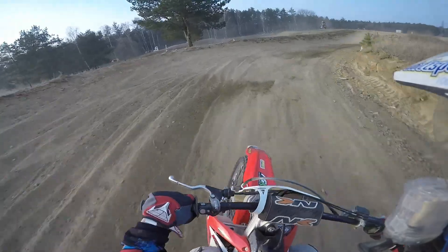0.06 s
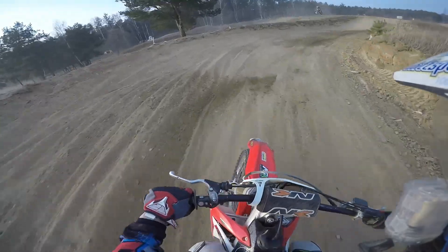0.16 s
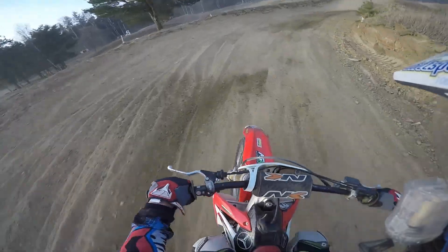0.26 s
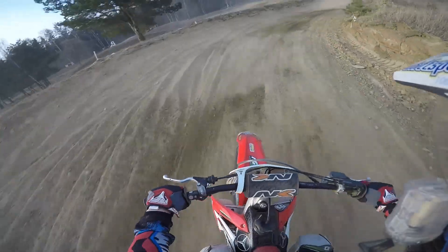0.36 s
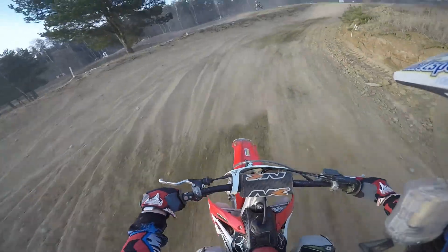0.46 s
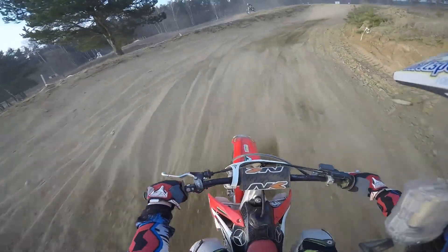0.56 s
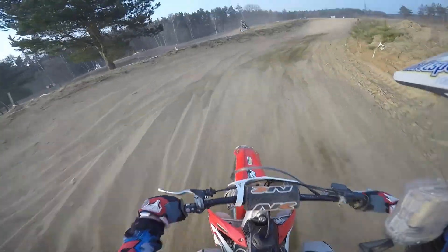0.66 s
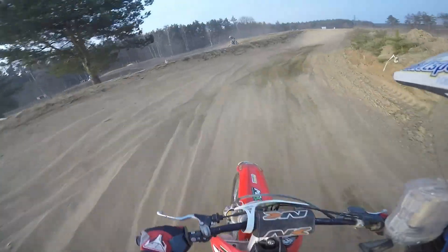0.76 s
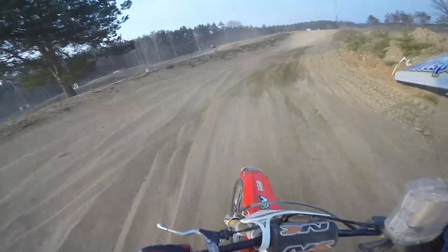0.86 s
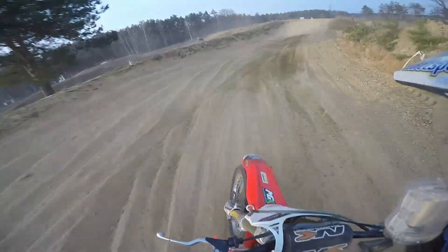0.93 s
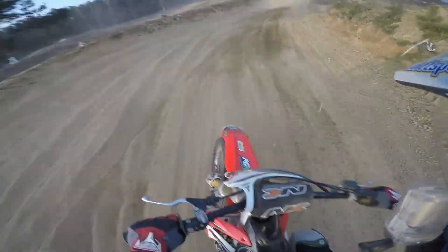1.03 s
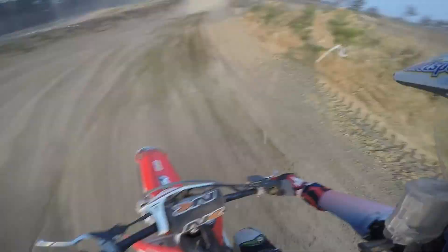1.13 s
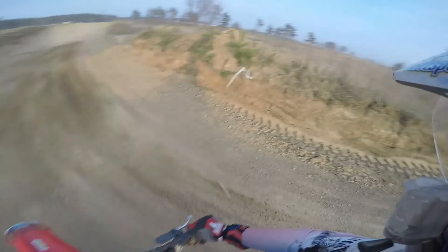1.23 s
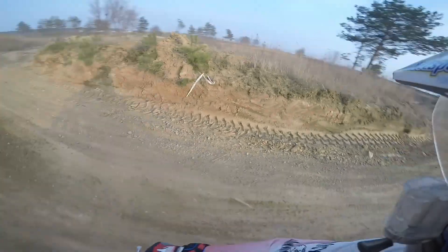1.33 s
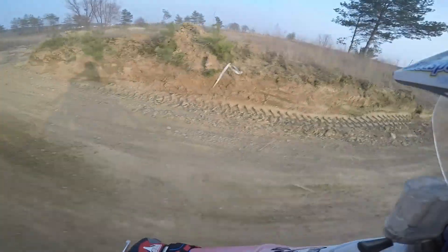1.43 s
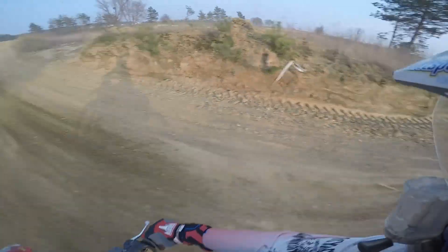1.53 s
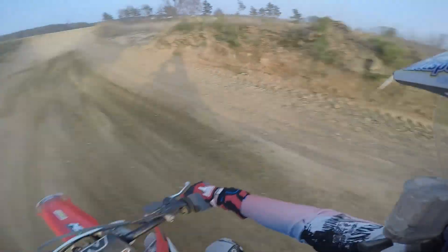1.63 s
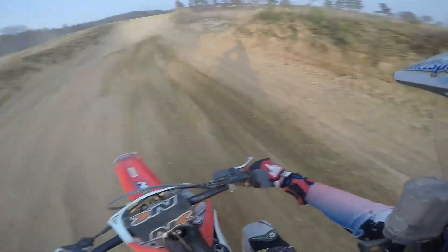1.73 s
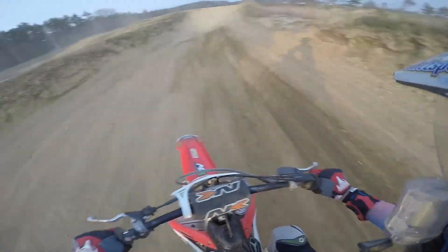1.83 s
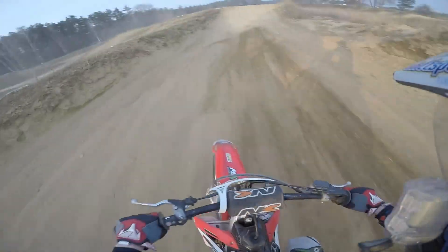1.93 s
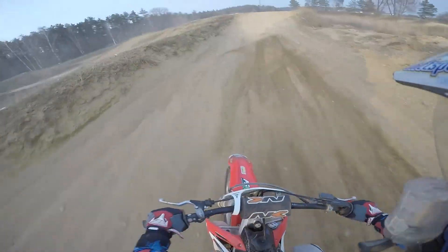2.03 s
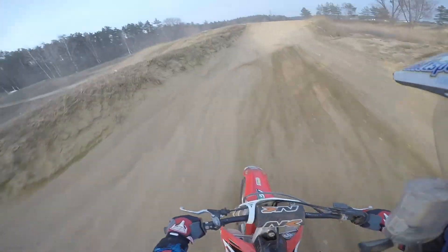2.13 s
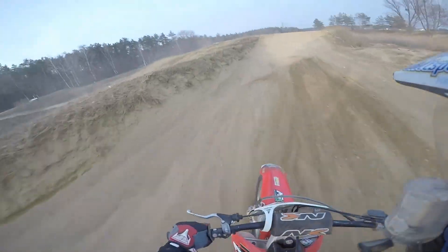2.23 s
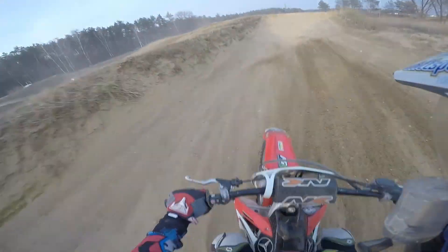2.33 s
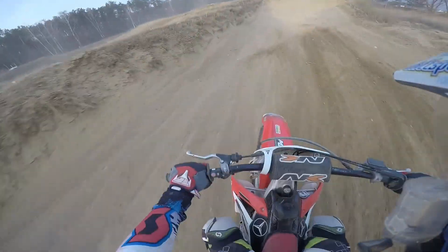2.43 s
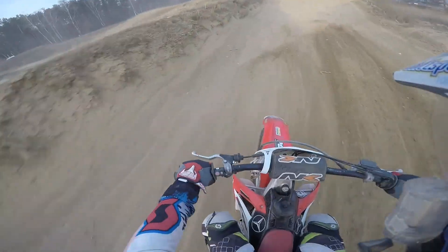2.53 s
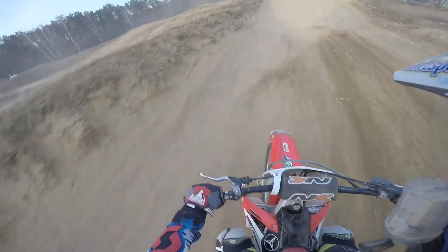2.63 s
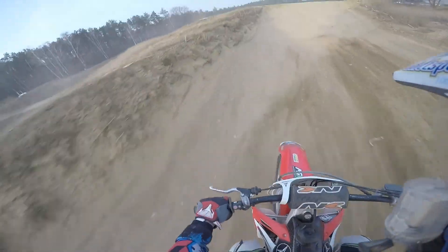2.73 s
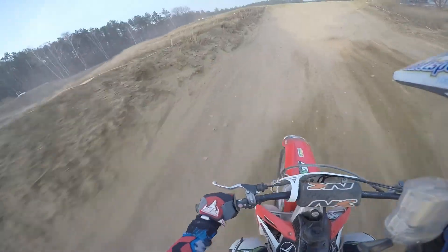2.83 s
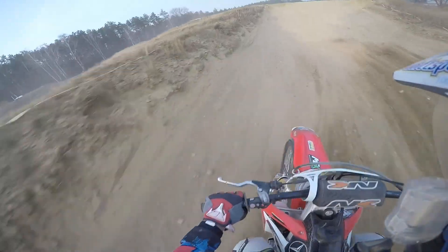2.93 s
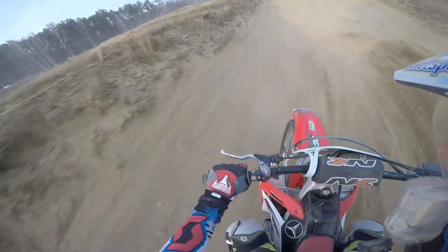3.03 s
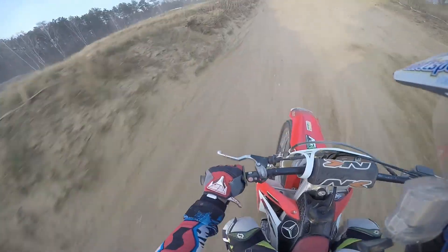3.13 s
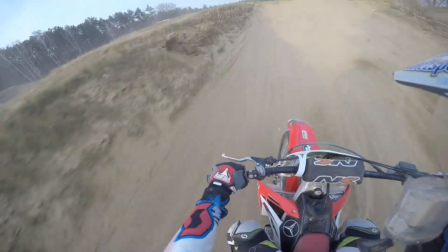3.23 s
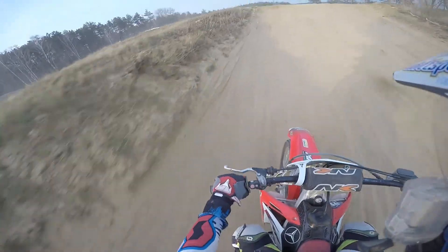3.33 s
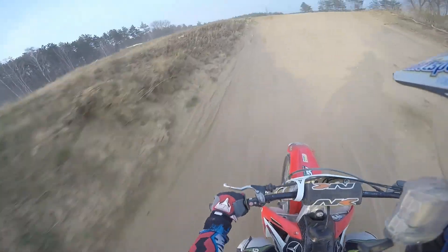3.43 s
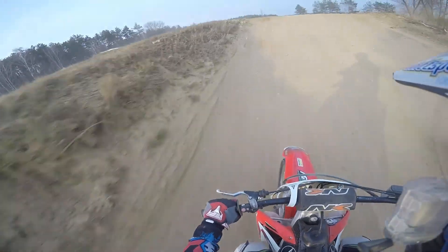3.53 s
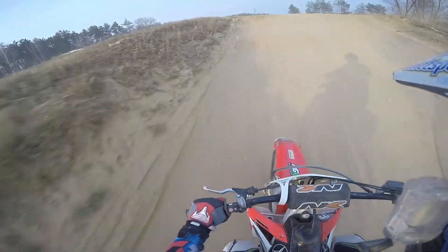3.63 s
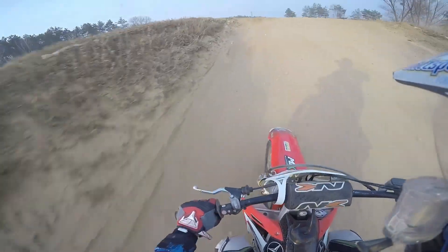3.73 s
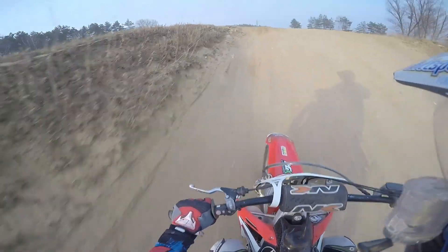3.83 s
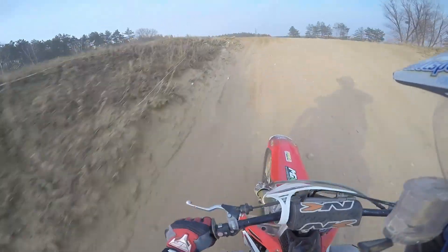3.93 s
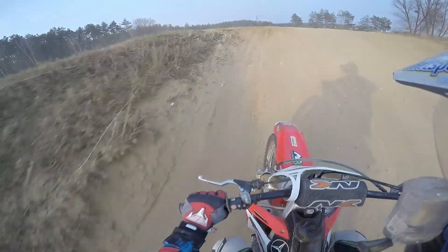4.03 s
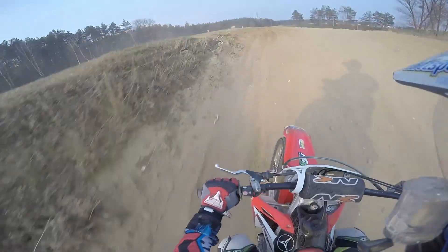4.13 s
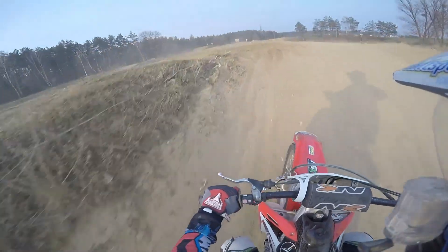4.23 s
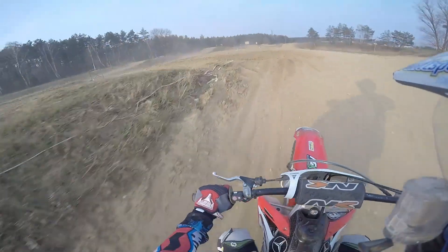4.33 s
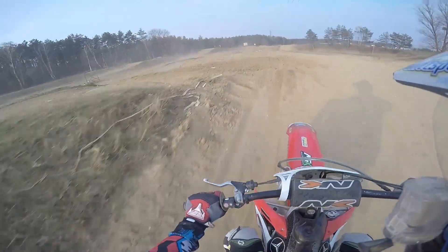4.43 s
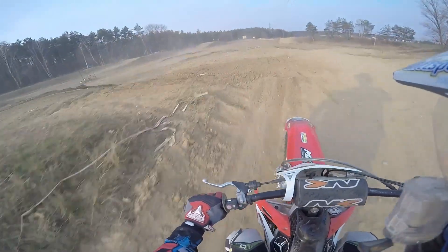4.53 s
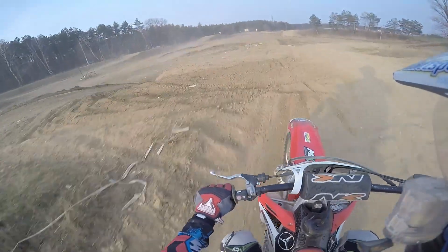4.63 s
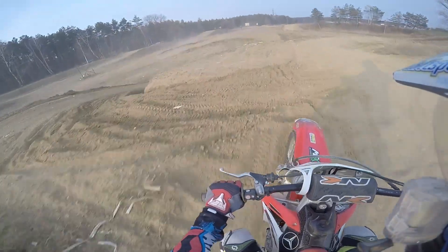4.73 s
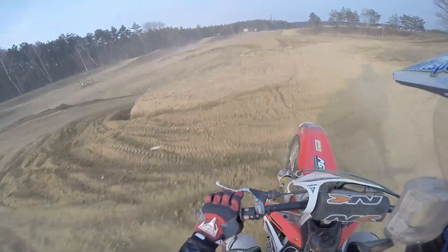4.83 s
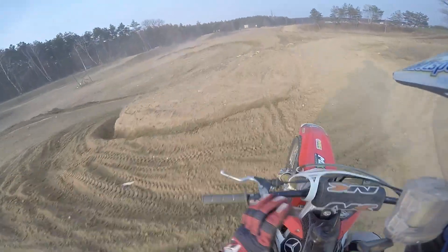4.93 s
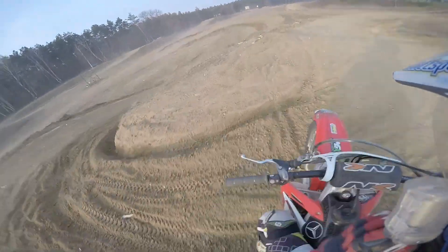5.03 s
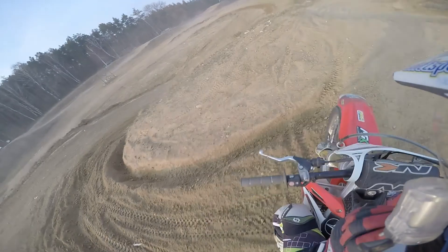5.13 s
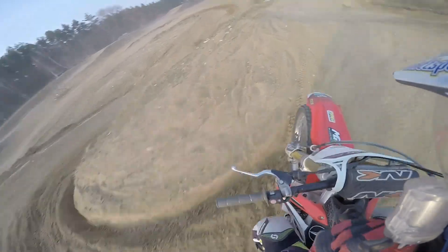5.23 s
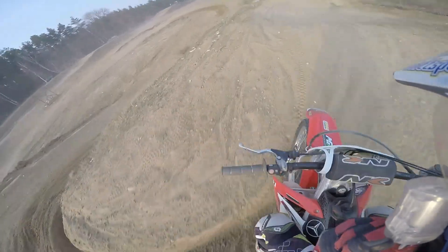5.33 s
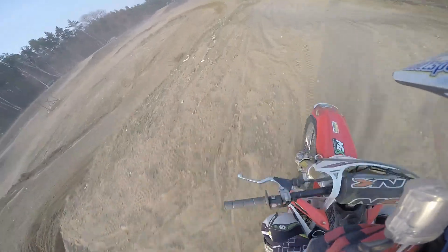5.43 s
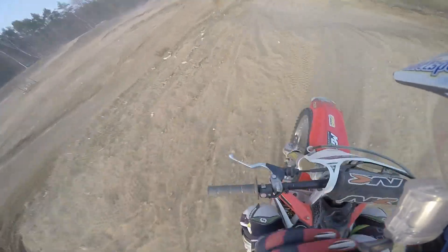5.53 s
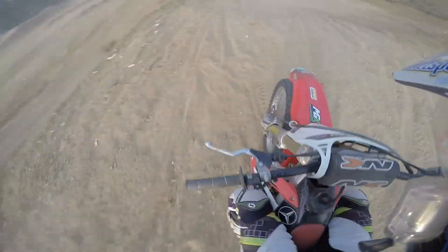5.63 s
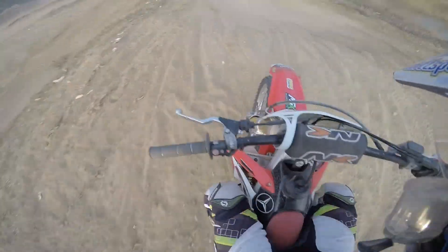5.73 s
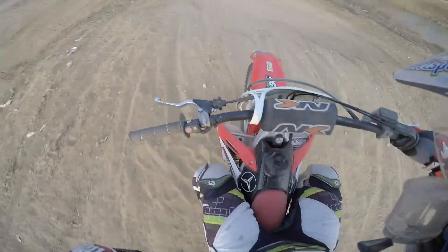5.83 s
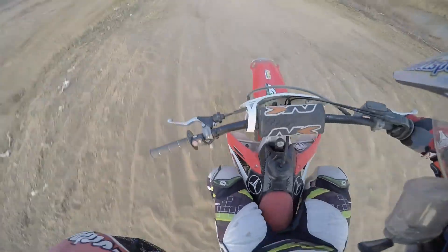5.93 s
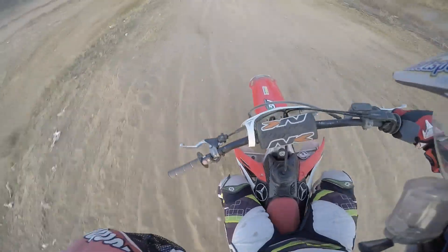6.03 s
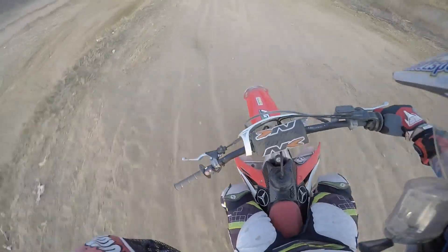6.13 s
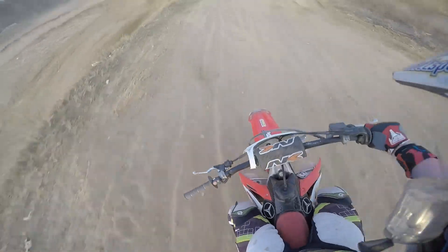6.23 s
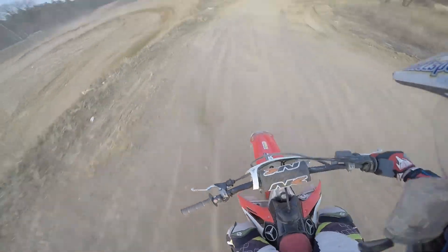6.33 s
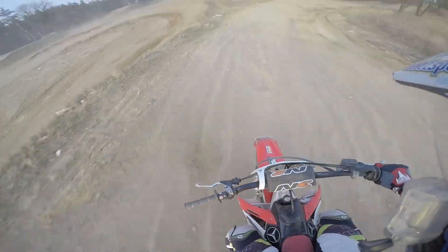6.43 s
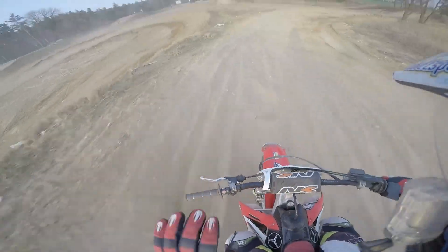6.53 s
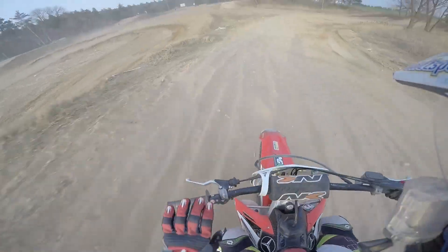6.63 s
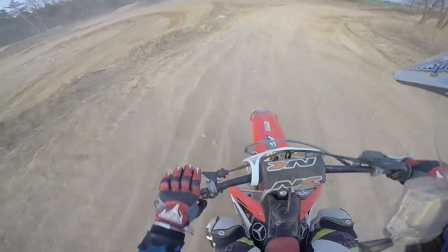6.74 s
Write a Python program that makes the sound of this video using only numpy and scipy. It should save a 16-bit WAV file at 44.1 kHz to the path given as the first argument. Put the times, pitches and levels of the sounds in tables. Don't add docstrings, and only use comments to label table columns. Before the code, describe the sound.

A single-cylinder dirt bike blips its throttle again and again over dry chain rattle, until a hard triple knock hits and the engine drops quieter.

```python
import sys
import numpy as np
from scipy import signal
from scipy.fft import rfft, irfft, next_fast_len
from scipy.io import wavfile
from scipy.ndimage import uniform_filter1d, map_coordinates

SR = 44100
rng = np.random.default_rng(int(sys.argv[2]) if len(sys.argv) > 2 else 0)


def pcm_store(signal):
    levels = np.round(np.clip(np.atleast_2d(signal), -1, 1) * 32767)
    wavfile.write(sys.argv[1], SR, levels.astype(np.int16).T)


def elevation(decibels):
    levels = np.asarray(decibels, float)
    return 10 ** (levels / 20)


N = 298557


def unit(x):
    return x / np.sqrt(np.mean(x ** 2) + 1e-20)


def curves(rows, at=None):
    times, *columns = np.transpose(rows)
    at = np.arange(N) / SR if at is None else at
    return [np.interp(at, times, column) for column in columns]


def wobble(rate):
    knots = rng.standard_normal(int(N * rate / SR) + 4)
    return map_coordinates(knots, [np.arange(N) * rate / SR])


def filtered(x, response):
    size = next_fast_len(N + SR // 2)
    spectrum = rfft(x, size) * response(np.fft.rfftfreq(size, 1 / SR))
    return irfft(spectrum, size)[:N]


def impulse_norm(response):
    return np.linalg.norm(filtered(np.arange(N) == 0, response))


def modes(table):
    def response(f):
        total = 0
        for k, (hz, width, db) in enumerate(table):
            damping = 1j * f * width
            total = total + (-1) ** k * elevation(db) * damping / (hz * hz - f * f + damping)
        return total
    return response


def slopes(points):
    hz, db = np.transpose(points)
    return lambda f: elevation(np.interp(np.log(f + 1), np.log(hz), db, left=-120))


def patchy(depth_db):
    z = signal.stft(rng.standard_normal(N + 512), nperseg=512)[2]
    field = uniform_filter1d(rng.standard_normal(z.shape), size=2, axis=0)
    field = uniform_filter1d(field, size=4, axis=1)
    return signal.istft(z * elevation(depth_db * unit(field)), nperseg=512)[1][:N]


def add_ring(out, s, db, hz, t60, rise):
    part = out[round(s * SR):][:round(1.5 * t60 * SR)]
    t = np.arange(len(part)) / SR
    envelope = elevation(db - 60 * t / t60) * (1 - np.exp(-t / rise))
    part += envelope * np.sin(2 * np.pi * hz * t)


def swells(t, s, hold, db, fall, rise):
    u = t - s[:, None]
    growth = rise * np.minimum(u, 0)
    decay = fall[:, None] * np.maximum(u - hold[:, None], 0)
    return elevation(2 * (db[:, None] + growth - decay))


DUCK_S = [
    5.667,
    5.725,
    5.85,
    6.034,
    6.037,
    6.3,
    6.55,
]
DUCK_DB = [-0.5, -13.5, -14.5, -13.5, -11, -8, -5.5]


def duck():
    return np.interp(np.arange(N) / SR, DUCK_S, DUCK_DB)


# (first loaded firing [s], hold [s], rattle [dB], fading [dB/s], pipe thump over rattle [dB])
BLIPS = [(.01, 0.059, -37, 80, -11), (0.1, 0.068, -20.5, 138, 1), (.47, 0.04, -22.5, 138, -3),
         (.845, 0.07, -21, 121, -1), (1.294, 0.042, -23.5, 61, 0), (1.525, 0.036, -23.5, 136, 2),
         (1.893, 0.055, -22.5, 80, 0), (2.166, 0.054, -31, 46, -2.5), (2.612, 0.087, -23.5, 126, 0.5),
         (2.889, 0.055, -21, 80, 0.5), (3.078, 0.069, -30, 30, -1.5), (3.541, 0.057, -19.5, 169, -1),
         (3.855, 0.062, -25, 90, -2.5), (4.09, 0.079, -21.5, 78, -2), (4.562, 0.01996, -38, 56, 3),
         (4.6, 0.025, -24.5, 74, 0), (5.097, 0.011, -21, 165, -3), (5.341, 0.038, -32, 54, -21),
         (5.43, 0.034, -26, 90, -2.5), (5.553, 0.075, -26, 99, -2.5), (6.042, 0.086, -29, 138, -1.5),
         (6.282, 0.028, -26, 113, -0.5), (6.474, 0.064, -30, 60, -1), (6.543, 0.025, -21.5, 103, -5)]
FIRINGS = [3, 14, 11, 14, 8, 12, 10, 14, 10, 7, 15, 11, 8, 15, 1, 13, 6, 2, 3, 12, 7, 6, 2, 7]
LAST_S = 6.78


def crank():
    climb_per_s, sag_s, sag_to = 1.3, 0.2, 0.62
    lead, lead_s = 0.5, 0.03
    s, hold = np.transpose(BLIPS)[:2]
    t = np.arange(N + SR // 10) / SR
    blip = np.maximum(np.searchsorted(s, t) - 1, 0)
    since_shut = t - (s + hold)[blip]
    next_blip = np.r_[s[1:], LAST_S][blip]
    pickup = 1 + lead * np.exp(-np.abs(next_blip - t) / lead_s)
    climb = np.exp(climb_per_s * np.minimum(since_shut, 0))
    sag = sag_to + (1 - sag_to) * np.exp(-np.maximum(since_shut, 0) / sag_s)
    free = np.cumsum(pickup * np.where(since_shut < 0, climb, sag))
    marks = np.interp(np.r_[0, s, LAST_S], t, free)
    return np.interp(free[:N], marks, np.cumsum(np.r_[.7, .3, FIRINGS]))


# (time [s], level [dB])
COAST = [(0, -31), (.3, -28.5), (.58, -31), (.74, -24.5), (.97, -25.5), (1.06, -31.5), (1.26, -30.5),
         (1.45, -27), (1.83, -30.5), (2.3, -30.5), (2.54, -31.5), (3.05, -27.5), (3.47, -33), (3.75, -30),
         (4.45, -32.5), (5.3, -35), (5.9, -39), (6.77, -29)]


def throttle(t):
    opening_s, opening_db_per_s = 0.012, 264
    overrun_db, overrun_db_per_s = -13, 33
    thump_shut_db = -14
    thump_fades = 2.37
    s, hold, db, fall, pipe_db = np.transpose(BLIPS)
    s = s + opening_s
    hold = np.maximum(hold - opening_s, 0)
    thump_db = db + pipe_db
    shut = elevation(2 * curves(COAST, t)[0])
    load = swells(t, s, hold, db, fall, opening_db_per_s).sum(0)
    pipe = swells(t, s, hold, thump_db, thump_fades * fall, opening_db_per_s).sum(0)
    overrun_fall = overrun_db_per_s + 0 * s
    pipe = pipe + swells(t, s, hold, thump_db + overrun_db, overrun_fall, opening_db_per_s).sum(0)
    pipe = pipe + shut * elevation(2 * thump_shut_db)
    return 10 * np.log10(load + shut), 10 * np.log10(pipe), load / (load + shut)


def hiss():
    return elevation(-75) * rng.standard_normal(N)


# (time [s], frequency [Hz])
SWAY = [(0.0, 29.2), (0.49, 33.15), (1.13, 26.12), (1.71, 24.42), (1.96, 30.95), (2.3, 25.28),
        (2.73, 35.88), (3.75, 27.9), (4.81, 29.49), (4.98, 24.5), (5.35, 26), (5.69, 22.06), (5.9, 30.72),
        (6.3, 25.52), (6.52, 29.9), (6.77, 27.1)]
# (time [s], level [dB], fading [dB/s])
BUMPS = [(.05, -24.5, 22), (0.782, -19.5, -11), (.96, -8, 70), (1.17, -19.5, 50), (1.48, -23, 62),
         (1.75, -26.5, 93), (1.87, -25.5, 122), (2.079, -24, 55), (2.24, -27, 50), (2.39, -23.5, 250),
         (2.55, -17, 300), (2.66, -25, 133), (2.9, -30, 60), (3.2, -25, 48), (3.36, -25, 200),
         (3.53, -23, 80), (3.64, -21.5, 122), (3.81, -15, 300), (3.92, -18.5, 74), (4.11, -10.5, 140),
         (4.28, -17.5, 180), (4.49, -15, 126), (4.84, -22.5, 204), (5.21, -6.5, 147), (5.409, -20.5, 57),
         (5.56, -14.5, 300), (5.74, -29, 42), (5.92, -25, 83), (6.35, -40, 20), (6.56, -26.5, 86),
         (6.77, -23.5, 63)]


def mount_rocking():
    calm_db, bump_db_per_s = -38, 205
    hz, = curves(SWAY)
    t, coarse = np.arange(N) / SR, np.arange(0, N, 64) / SR
    s, bump_db, fall = np.transpose(BUMPS)
    power = swells(coarse, s, 0 * s, bump_db, np.maximum(fall, 45), bump_db_per_s).sum(0)
    level_db = np.interp(t, coarse, 10 * np.log10(power + elevation(2 * calm_db))) + 2.0 * wobble(10)
    rock = np.sqrt(2) * np.sin(2 * np.pi * np.cumsum(hz) / SR + 0.5 * wobble(8))
    buffet_shape = slopes([(16, -18), (24, -2.0), (40, -9), (52, -9.5), (70, -120)])
    buffet = unit(filtered(rng.standard_normal(N), buffet_shape))
    return elevation(level_db) * (rock + elevation(-8) * buffet)


# (frequency [Hz], level [dB per Hz])
ROAD = [(35, -39), (55, -2.5), (80, 4.5), (150, -7.5), (220, -2.5), (400, -14), (800, -15), (1500, -120)]
# (multiple of firing rate, level [dB], increase under load [dB])
SHAKE_ORDERS = [(2, -3, 5), (3, -8, 0), (4, 1, -9), (5, -4, -5), (6, -4, -2)]
# (time [s], level [dB])
TRACK = [(0, -31.5), (.35, -31), (.8, -34), (1.12, -37), (1.4, -31.5), (2.05, -30), (2.45, -34), (2.7, -30),
         (3.2, -30.5), (3.7, -30.5), (4.25, -34), (4.7, -34), (4.95, -33.5), (5.3, -34.5), (5.9, -30.5),
         (6.2, -31), (6.77, -29.5)]


def helmet_shake():
    road = filtered(rng.standard_normal(N), slopes(ROAD))
    road = unit(road * elevation(3.1 * wobble(25)))
    turns = crank()
    coarse = np.arange(0, N, 64) / SR
    loaded = np.interp(np.arange(N) / SR, coarse, throttle(coarse)[2])
    orders = np.zeros(N)
    for k, level_db, more_db in SHAKE_ORDERS:
        strength = elevation(level_db + more_db * loaded + 3.7 * wobble(6.6))
        orders += strength * np.sin(2 * np.pi * k * turns + 0.42 * wobble(9.3))
    shake_db = curves(TRACK)[0] + 5.5 * loaded + 1.65 * duck()
    return elevation(shake_db) * (elevation(-4.5) * road + elevation(-2) * unit(orders))


# (time [s], peak [dB], frequency [Hz])
TICKS = [(0.308, -23.5, 1180), (0.687, -22, 1260), (1.14, -26.5, 1120), (1.699, -76, 953),
         (2.502, -18.5, 1180), (3.281, -18, 1290), (3.951, -17.5, 1245), (4.182, -22, 1250),
         (3.42, -22.5, 1196), (4.79, -30, 1240), (4.825, -26.5, 1260), (4.916, -25, 1240),
         (6.025, -38, 1241)]
# (time [s], peak [dB], frequency [Hz], t60 [s])
PINGS = [(0.513, -29, 8700, 0.087), (1.575, -42, 8180, 0.14), (5.112, -42, 9770, 0.064),
         (5.136, -24.5, 9960, 0.034), (5.157, -44, 9780, .04), (5.171, -27, 9700, 0.025),
         (5.331, -31, 9570, 0.023), (5.603, -43, 9580, 0.044), (5.621, -30, 9750, 0.05),
         (5.64, -48, 9700, .05), (5.695, -76, 9980, 0.031), (5.713, -15, 7400, 0.013),
         (5.741, -45, 9780, 0.018), (6.149, -43, 7250, 0.048), (6.441, -40, 7090, 0.043)]


def small_parts():
    out = np.zeros(N)
    for s, db, hz in TICKS:
        add_ring(out, s, db - 1.0, hz, .05, rise=0.00029)
        add_ring(out, s + .003, db - 3, hz * .86, .06, rise=.003)
    for row in PINGS:
        add_ring(out, *row, rise=0.0011)
    return out


# (time [s], level [dB], frequency [Hz], t60 [s])
SHELL = [(5.178, -9.5, 80, .7), (5.178, -13.5, 145, 0.09), (4.1, -20, 95.9, 0.13),
         (5.6788, -1.5, 82.9, 0.24), (5.6906, -12.5, 80.5, 1.0), (6.7, -19, 110, 0.048),
         (5.715, -22, 188, 0.23), (5.85, -32, 122, .3)]
# (time [s], peak [dB], hardness [Hz])
BLOWS = [
    (5.6738, -5, 3000),
    (5.6872, 3, 4800),
    (5.7138, -2, 1500),
]
# (frequency [Hz], t60 [s], level in first, second, third blow [dB])
KNOCK = [(953, 0.022, -2, -4.5, -0.5), (1245, 0.019, 2.5, -4.5, -1.5), (1500, 0.017, -9, -2, -5.5),
         (2240, 0.013, -3, 7, -1), (2590, 0.013, -25, -5, -19), (3000, 0.017, -14, -10, -13),
         (3430, 0.019, -29, -11, -36), (5110, 0.013, -8.5, -9, -33), (6300, 0.02, -15, -31, -24)]


def helmet():
    out, t = np.zeros(N), np.arange(SR // 20) / SR
    for row in SHELL:
        add_ring(out, *row, rise=0.0011)
    for k, (s, db, hard_hz) in enumerate(BLOWS):
        for hz, t60, *levels in KNOCK:
            add_ring(out, s, db + levels[k], hz, t60, rise=0.00013)
        crack = elevation(db - 4 - 60 * t / 0.012) * rng.standard_normal(len(t))
        lowpass = signal.butter(2, min(hard_hz, 20000), fs=SR, output="sos")
        out[round(s * SR):][:len(t)] += signal.sosfilt(lowpass, crack)
    return out


# (centre [Hz], width [Hz], level [dB])
SLAP = [(2890, 270, -0.5), (3620, 590, -1.5)]


def chain():
    from_db, grows = -25, 3.1
    rasp = elevation(2.5 * wobble(70)) * patchy(3)
    rasp = unit(filtered(rasp, lambda f: modes(SLAP)(f) ** 2))
    return elevation(from_db - 5.5 + grows * (curves(COAST)[0] - from_db)) * rasp


# (centre [Hz], width [Hz], level [dB])
PIPE = [(170, 230, -22), (254, 106, 6.5), (344.4, 96, -8.5), (421.6, 104, -4.5), (559, 127, -10)]


def exhaust(f):
    total = 0
    for hz, width, db in PIPE:
        trips = sum(.85 ** k * np.exp(-2j * np.pi * f * k / hz) for k in range(3))
        total = total + elevation(db) * modes([(hz, width, 0)])(f) ** 2 * trips
    return total


# (centre [Hz], width [Hz], level [dB])
BARK = [(1700, 320, 0), (2500, 400, -2), (3400, 500, -4)]


def pipe_sound(kicks, hot):
    hot_pitch = 1.039
    cool_thump = filtered(kicks * (1 - hot), exhaust)
    hot_thump = filtered(kicks * hot, lambda f: exhaust(f / hot_pitch))
    thump = elevation(-1.47) * (cool_thump + hot_thump) / impulse_norm(exhaust)
    edge = lambda f: modes(BARK)(f) ** 2
    bark = elevation(-7) * filtered(kicks * hot, edge) / impulse_norm(edge)
    return thump + bark


def burst(t, fall):
    age = np.abs(t)
    return np.where(t > 0, (1 - np.exp(-age / .0016)) * np.exp(-age / fall), 0)


def crack_gate(since, echo_luck, size_luck):
    direct = burst(since, .0016)
    ground = .35 * burst(since - .0055 - .001 * echo_luck, .002)
    escaping = .12 * burst(since, .012)
    return unit(direct + ground + escaping) * elevation(1.2 * size_luck)


# (centre [Hz], width [Hz], level [dB])
CASE = [(937, 143, -5), (1241, 93, 0.5), (1718, 306, 0), (2465, 294, 0), (2753, 206, 0), (3012, 267, -0.5),
        (3496, 400, -1.5), (4200, 1500, -15.5)]
# (frequency [Hz], level [dB per Hz])
TREBLE = [(2590, -46), (4400, 2.5), (4880, -5), (5260, -1), (5700, -2.5), (6280, 1.5), (9680, -8.5),
          (11100, -16.5), (14400, -19), (15600, -25), (16000, -56)]
# (centre [Hz], width [Hz], level [dB])
FINS = [(5214, 134, 2), (6100, 210, -16), (8000, 71, -8), (8530, 170, -2), (9870, 730, 0)]


def engine():
    treble_shut_db, treble_open_db = -17, -13.5
    crack_shut, crack_open = .12, .72
    turns = crank()
    cycle = turns.astype(int)
    starts = np.r_[0, np.flatnonzero(np.diff(cycle)) + 1]
    since = (np.arange(N) - starts[cycle]) / SR
    luck = rng.standard_normal((len(starts), 4))
    held_db, thump_db, loaded = throttle(starts / SR + 0.009)
    level_db = uniform_filter1d(held_db[cycle], size=300)
    treble_db = treble_shut_db + (treble_open_db - treble_shut_db) * loaded
    treble_db = uniform_filter1d(treble_db[cycle], size=700)
    share = np.clip(crack_shut + (crack_open - crack_shut) * loaded, 0, .95)[cycle]

    kicks = np.zeros(N)
    late = np.clip(starts + SR * .0004 * (3 + luck[:, 0]), 0, N - 1).astype(int)
    period = np.diff(starts, append=N + 900)
    kicks[late] = elevation(thump_db + 1.2 * luck[:, 1]) * np.sqrt(period)
    pipe = pipe_sound(kicks, loaded[cycle] ** 3)

    gate = crack_gate(since, luck[cycle, 3], luck[cycle, 2])
    valves = unit(1 + 0.028 * np.cos(4 * np.pi * turns - 1.1))
    lumps = elevation(1.6 * wobble(60))

    def crack_and_rattle(part):
        crack = np.sqrt(part) * gate * rng.standard_normal(N)
        return crack + np.sqrt(1 - part) * valves * lumps * patchy(3)

    body = unit(filtered(crack_and_rattle(share), modes(CASE)))
    metal = lambda f: slopes(TREBLE)(f) * (1 + np.abs(modes(FINS)(f)))
    fizz = unit(filtered(crack_and_rattle(.6 * share), metal))
    return pipe + elevation(level_db - 1.5) * (body + elevation(treble_db + 1.15) * fizz)


def scene():
    background = hiss() + mount_rocking() + helmet_shake()
    handling = small_parts() + helmet()
    machine = elevation(duck()) * (chain() + engine())
    return (background + handling + machine)[None]


def top_cut(x):
    return signal.sosfilt(signal.butter(12, 15450, fs=SR, output="sos"), x)


def record(dry):
    clip_level, top_hz = 1.0, 15200
    clipped = dry[0] / (1 + np.abs(dry[0] / clip_level) ** 6) ** (1 / 6)
    kept = filtered(clipped, lambda f: 1 / (1 + (f / top_hz) ** 80))
    return top_cut(kept[None])


dry = scene()
out = record(dry)
pcm_store(out)
```